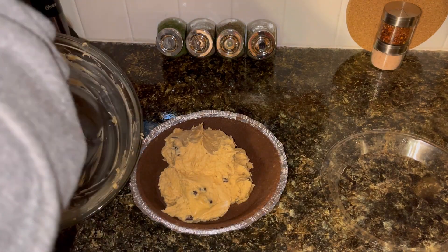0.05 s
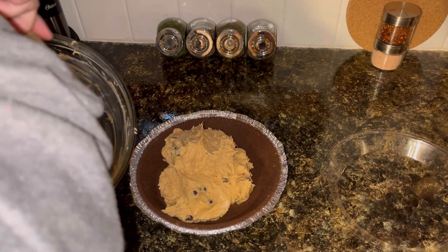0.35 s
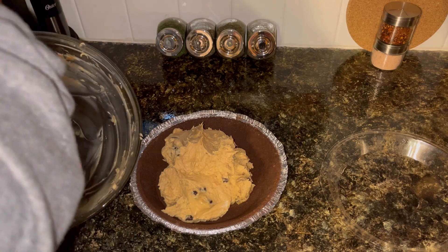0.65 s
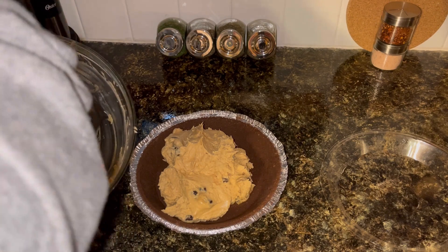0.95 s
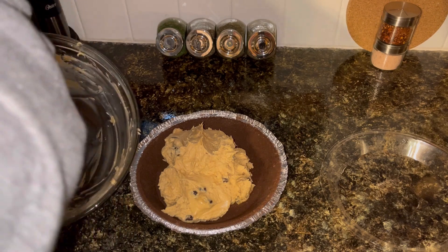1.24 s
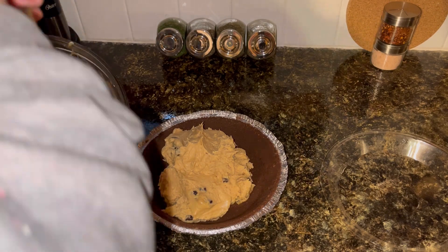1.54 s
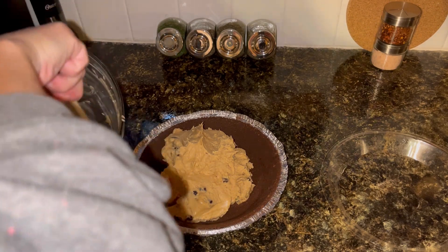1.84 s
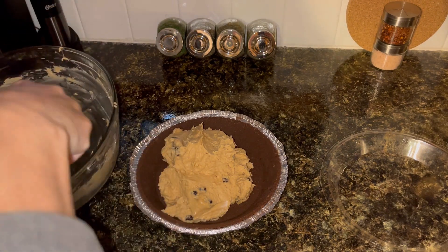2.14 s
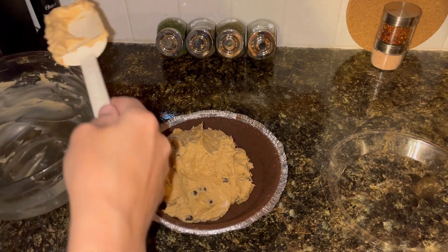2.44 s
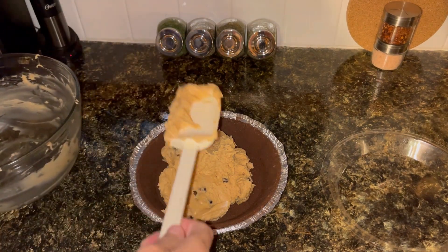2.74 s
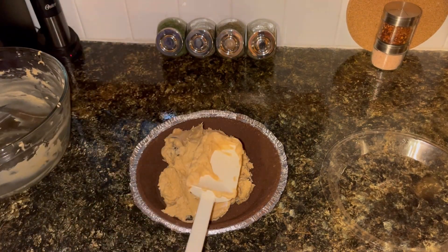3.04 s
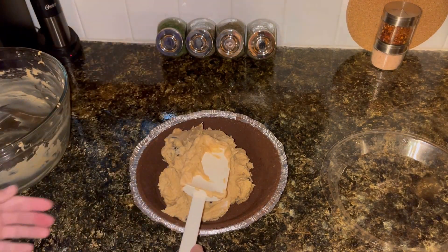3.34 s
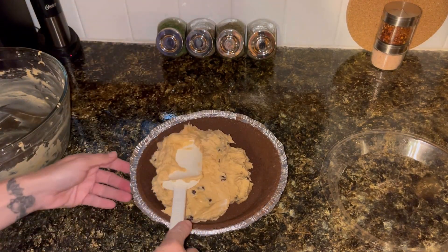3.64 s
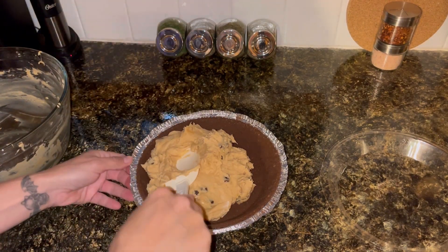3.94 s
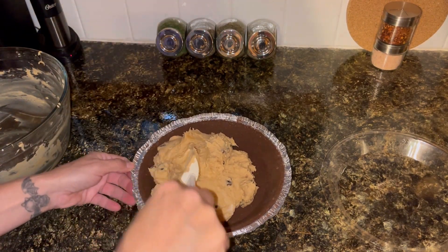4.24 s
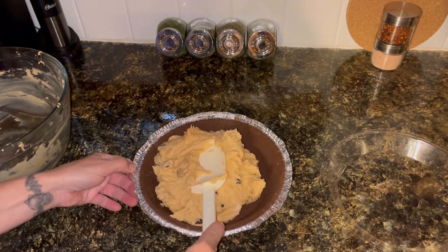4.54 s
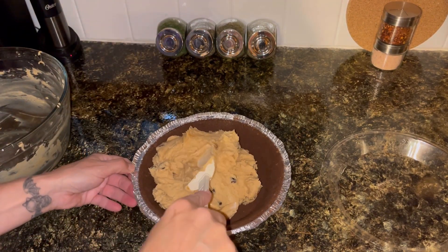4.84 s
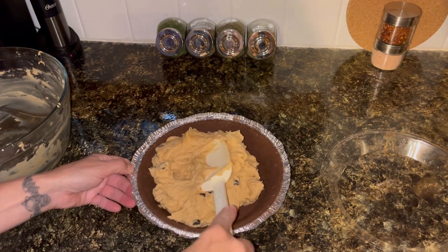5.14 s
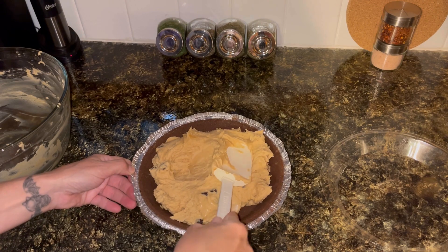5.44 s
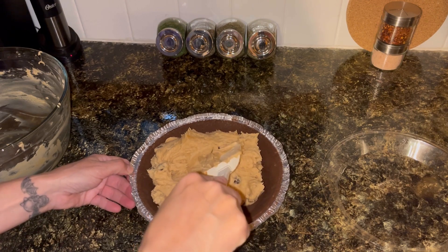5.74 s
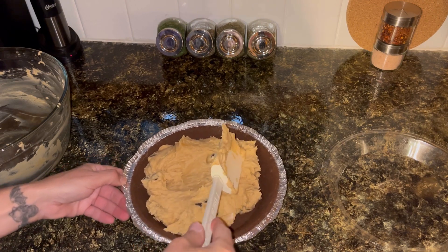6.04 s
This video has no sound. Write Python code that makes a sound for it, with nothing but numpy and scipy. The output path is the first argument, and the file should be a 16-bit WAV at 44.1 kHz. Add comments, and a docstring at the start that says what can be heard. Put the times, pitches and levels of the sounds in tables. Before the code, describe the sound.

Faint sticky scraping, a glass bowl shoved over stone with a thud, then filling smacking wetly as it is spread in a ticking foil pan.

```python
"""In a small quiet kitchen, a silicone spatula wipes creamy filling from a glass bowl: the cream
crackles and pops, the blade rubs and taps the glass once (1.0 s). From 2.3 s the bowl slides in short,
gritty, ringing shoves on a stone counter, and is set down with a thud (2.6 s). From 3.4 s the spatula
spreads the filling with wet smacks in a foil pan, which ticks as it flexes."""
import sys
import numpy as np
from scipy import signal
from scipy.fft import rfft, irfft
from scipy.io import wavfile

SR = 44100
rng = np.random.default_rng(int(sys.argv[2]) if len(sys.argv) > 2 else 0)


def wav_record(signal):
    """Record a signal, one row per channel, as 16-bit PCM in the file named by sys.argv[1]."""
    frames = np.transpose(np.atleast_2d(signal))
    bounded = np.clip(frames, -1, 1)
    # unit amplitude maps onto the largest positive 16-bit level
    quanta = np.round(bounded * 32767).astype(np.int16)
    wavfile.write(sys.argv[1], SR, quanta)


N = 268128


def gain_of(db):
    """Decibels to amplitude."""
    return 10 ** (np.asarray(db) / 20)


def unit_rms(x):
    """Scales to rms 1."""
    return x / np.sqrt(np.mean(x ** 2) + 1e-20)


def unit_peak(x):
    """Scales to peak 1."""
    return x / np.abs(x).max()


def at_hz(points, hz):
    """Interpolates a table over log frequency."""
    table_hz, value = np.transpose(points)
    return np.interp(np.log(hz + 1), np.log(table_hz + 1), value)


def add(mix, time_s, sound):
    """Mixes a sound in at time_s."""
    part = mix[round(time_s * SR):][:len(sound)]
    part += sound[:len(part)]


def colour(x, spectrum, size=8192):
    """Minimum-phase EQ, keeps clicks sharp. Spectrum: (frequency [Hz], gain [dB])."""
    hz = np.abs(np.fft.fftfreq(size, 1 / SR))
    log_gain = np.log(gain_of(at_hz(spectrum, hz)))
    response = np.fft.ifft(np.exp(np.conj(signal.hilbert(log_gain)))).real[:size // 2]
    return signal.oaconvolve(x, response)[:len(x)]


def noise(spectrum):
    """Steady coloured noise, no DC, rms 1."""
    hz = np.fft.rfftfreq(N, 1 / SR)
    shaped = rfft(rng.standard_normal(N)) * gain_of(at_hz(spectrum, hz))
    return unit_rms(irfft(shaped * hz / (hz + 6), N))


def resonate(x, hz, width_hz):
    """One-pole resonance centred on hz."""
    carrier = np.exp(2j * np.pi * hz * np.arange(len(x)) / SR)
    pole = np.exp(-np.pi * width_hz / SR)
    return (carrier * signal.lfilter([1 - pole], [1, -pole], x / carrier)).real


def ring(modes):
    """Struck body: decaying sines of alternating sign."""
    t = np.arange(SR) / SR
    return sum((-1) ** k * gain_of(db - 60 * t / t60_s) * np.sin(2 * np.pi * hz * t)
               for k, (hz, db, t60_s) in enumerate(modes))


def grains(per_s, spread_db, clump_db, clump_hz, hiss):
    """Tiny uneven slips in clumps, over a hiss of smaller ones."""
    size = gain_of(spread_db * np.minimum(rng.exponential(1, N), 3.5))
    clicks = size * rng.choice([-1, 1], N) * (rng.random(N) < per_s / SR)
    clumps = np.interp(np.arange(N) * clump_hz / SR, np.arange(N), rng.standard_normal(N))
    return (unit_rms(clicks) + hiss * rng.standard_normal(N)) * gain_of(clump_db * clumps)


def burst(t60_s, hz, q, snap):
    """A snap and its decaying spray through one resonance, Q at least 0.6."""
    t = np.arange(SR // 4) / SR
    spray = rng.standard_normal(len(t)) * gain_of(-60 * t / t60_s)
    spray[0] = snap
    b, a = signal.iirpeak(hz, max(q, .6), fs=SR)
    return unit_peak(signal.lfilter(b, a, spray))


def stroke(start_s, length_s, crest, swell_db, attack_s=0.034, release_s=0.039):
    """Gain of one hand movement, peaking at the fraction crest of its length."""
    t = np.arange(N) / SR - start_s
    contact = np.interp(t, [-attack_s, 0, length_s, length_s + release_s], [0, 1, 1, 0])
    force_db = np.interp(t, [0, crest * length_s, length_s], [-swell_db, 0, -swell_db])
    return contact * gain_of(force_db)


# room rumble: (time [s], level [dB])
RUMBLE_LEVELS = [(0, -47), (.9, -42.5), (1.15, -41), (3.2, -39), (4.7, -43), (6.08, -39)]
# room rumble and hiss spectra: (frequency [Hz], gain [dB])
RUMBLE_EQ = [(20, 10.5), (35, -9.5), (60, -7.5), (90, -20), (130, -25.5), (250, -52), (1000, -100)]
HISS_EQ = [(60, 3), (120, -3), (200, -5.5), (400, -10), (800, -17), (1300, -20.5), (2000, -24),
           (4000, -25.5), (8000, -30.5), (12000, -33), (16000, -33)]


def room_tone(hiss_db=-63.5, whine_hz=1136, whine_db=-86):
    """Swelling low rumble, faint hiss and a thin appliance whine."""
    whine = unit_rms(resonate(rng.standard_normal(N), whine_hz, width_hz=1.4))
    rumble_db = np.interp(np.arange(N) / SR, *np.transpose(RUMBLE_LEVELS))
    rumble = gain_of(rumble_db) * noise(RUMBLE_EQ)
    return rumble + gain_of(hiss_db) * noise(HISS_EQ) + gain_of(whine_db) * whine


# strokes round the bowl: (start [s], length [s], crest [0-1], crackle [dB], rub [dB])
WIPE_STROKES = [(0.0, 0.2, 1, -75.5, -69.5), (0.312, 0.28, 1, -84.5, -66.5), (0.59, 0.23, 0.26, -75, -75),
                (1.142, .16, 1, -72.5, -76), (1.343, 0.296, 0.65, -96, -57), (1.738, 0.305, 1, -78, -56.5),
                (2.126, 0.5, 0.39, -80, -54)]
# cream crackle and blade rub spectra: (frequency [Hz], gain [dB])
CRACKLE_EQ = [(500, -24), (1500, -13), (3000, -7), (5000, -2), (7000, 0), (10000, -5), (13000, -22)]
RUB_EQ = [(80, 1), (150, 19.5), (280, -8), (420, -2), (600, -4), (1000, -10.5), (2000, -16), (4000, -42.5)]


def wiping():
    """Cream crackles off the glass while the blade rubs."""
    wet = sum(gain_of(db) * stroke(*timing, swell_db=2.5) for *timing, db, _ in WIPE_STROKES)
    press = sum(gain_of(db) * stroke(*timing, swell_db=5) for *timing, _, db in WIPE_STROKES)
    pops = grains(per_s=350, spread_db=4, clump_db=2, clump_hz=70, hiss=.5)
    slips = grains(per_s=220, spread_db=6, clump_db=5, clump_hz=40.5, hiss=0.44)
    return wet * unit_rms(colour(pops, CRACKLE_EQ)) + press * unit_rms(colour(slips, RUB_EQ))


# air pockets: (time [s], level [dB], pitch [Hz], t60 [s])
POCKET_POPS = [(.149, -50, 6700, 0.044), (.1774, -46, 5070, .05), (0.212, -53.5, 3020, 0.052),
               (.797, -41.5, 5100, 0.038), (3.449, -47.5, 1580, 0.13), (3.725, -40.5, 5000, 0.032),
               (3.8163, -39, 3500, .088), (3.824, -37, 3550, 0.071), (4.531, -41, 5500, 0.014),
               (4.562, -40, 5800, .02), (4.574, -39, 5000, 0.018), (4.59, -45, 5400, .03),
               (4.604, -35.5, 5400, 0.027), (5.538, -45, 1800, 0.079), (5.803, -41.5, 5170, 0.014),
               (5.9, -47.5, 1270, 0.078)]


def smacks():
    """Larger air pockets pop, their treble softened by the cream."""
    out = np.zeros(N)
    for time_s, db, hz, t60_s in POCKET_POPS:
        add(out, time_s, gain_of(db) * burst(t60_s, hz, q=1.2, snap=5.3))
    return colour(out, [(300, 19.5), (800, 11), (1500, 1.5), (6500, 1.5), (10000, -11), (13000, -9)])


# bowl modes; each close pair has a fast and a slow decay: (frequency [Hz], level [dB], t60 [s])
BOWL_MODES = [(393, -6, .33), (958, -7, .13), (1699, 0, .1), (2283, -8, .07), (1696, -10, .42),
              (2640, -1.5, .075), (3047, -10, .09), (2638, -12.5, .42), (3736, -3, .1), (5066, -11, .11),
              (5835, -13, .14), (6315, -15, .12), (7111, -16, .14)]
# spatula on glass: (time [s], level [dB])
BOWL_TAPS = [(1.02, -30)]
# sharp contact ticks, most as the bowl bumps the counter: (time [s], level [dB], pitch [Hz], t60 [s])
CONTACT_TICKS = [(1.28, -52.5, 1670, .06), (1.465, -54.5, 1690, 0.04), (1.5368, -39, 3520, 0.2),
                 (1.989, -53.5, 1500, 0.09)]


def tap_and_ticks():
    """A tap rings the bowl; the bowl's bumps on the counter only give brief contact ticks."""
    out = np.zeros(N)
    for time_s, db in BOWL_TAPS:
        clink = unit_peak(ring(BOWL_MODES))
        add(clink, 0, 1.6 * burst(t60_s=0.032, hz=2330, q=0.9, snap=1.5))
        add(out, time_s, gain_of(db) * unit_peak(clink))
    for time_s, db, hz, t60_s in CONTACT_TICKS:
        add(out, time_s, gain_of(db) * burst(t60_s, hz, q=0.54, snap=4.4))
    return colour(out, [(6500, 0), (9000, -5.5), (13000, -17)])


# stone counter modes: (frequency [Hz], level [dB], t60 [s])
COUNTER_MODES = [(76.4, -22, 0.87), (157.3, 6.5, 0.035), (171, -1, 0.051), (209.4, -3.5, 0.12),
                 (293.5, -6.5, 0.12), (367.5, -3, 0.068), (447, -4, 0.036), (544.6, -3, 0.1),
                 (603, -9, 0.12), (722, -5, 0.093), (820, -6.5, 0.044), (1106, -6.5, 0.034)]
# blows thudding through the counter (at 3.44 s a hand knocks the pan): (time [s], peak [dB], cutoff [Hz])
COUNTER_BLOWS = [(1.02, -30, 70), (1.282, -40.5, 347), (1.348, -51, 350), (1.46, -45.5, 380),
                 (1.981, -43.5, 410), (2.113, -48, 390), (2.196, -51.5, 380), (2.435, -43, 403),
                 (2.604, -19.5, 259), (2.616, -10, 810), (2.6331, -10, 277), (2.825, -33.5, 400),
                 (2.935, -35.5, 287), (3.045, -44, 900), (3.439, -45, 450), (3.627, -51, 700),
                 (5.905, -41.5, 450)]


def thumps():
    """The counter thuds; softer contact rings fewer upper modes."""
    out, body = np.zeros(N), unit_peak(ring(COUNTER_MODES))
    for time_s, db, cutoff_hz in COUNTER_BLOWS:
        thud = signal.lfilter(*signal.butter(2, cutoff_hz, fs=SR), body)
        add(out, time_s, gain_of(db) * unit_peak(thud))
    return out


def singing(level_db=-60.5):
    """The rubber edge briefly bows the bowl's modes."""
    bowing = colour(rng.standard_normal(N), [(400, 6), (1700, -15), (4000, -24)])
    tone = unit_rms(signal.oaconvolve(bowing, ring(BOWL_MODES))[:N])
    return gain_of(level_db) * stroke(start_s=1.654, length_s=0.24, crest=0.65, swell_db=8) * tone


# bowl over stone: (start [s], length [s], crest [0-1], grit [dB], judder [dB])
SHOVE_STROKES = [(2.273, 0.031, .8, -63, -74.5), (2.424, 0.26, 0.13, -67, -61.5),
                 (2.597, 0.17, 0.1, -49, -39), (2.811, 0.18, 0.076, -51, -39.5),
                 (3.006, 0.057, 0.74, -43, -47.5)]
# bowl catching on grit: (time [s], level [dB], pitch [Hz], t60 [s], Q)
GRIT_CATCHES = [(2.295, -46, 2180, 0.088, 0.46), (2.432, -49, 1830, 0.069, 0.9),
                (2.68, -33, 6000, 0.055, 0.5), (2.771, -42, 1460, 0.028, 1.6),
                (2.826, -33.5, 4350, 0.068, 0.39), (2.9898, -32, 3030, 0.039, 12),
                (2.995, -33.5, 1750, 0.099, 9.8), (3.018, -28.5, 5000, 0.047, 0.39),
                (3.046, -23, 4560, 0.038, 0.35)]
# high modes of the sliding bowl: (frequency [Hz], level [dB], t60 [s])
SLIDE_MODES = [(1736, -5, .18), (1832, -4, .2), (2428, -7, .13), (2805, -1, .2), (4237, -4, .13),
               (4829, -5, .13), (5843, 1, .17), (6624, 2, .18), (7074, 1, .18), (8732, -4, .11)]
# grit and counter judder spectra: (frequency [Hz], gain [dB])
GRIT_EQ = [(400, 4.5), (600, 5.5), (850, 7.5), (1300, 3.5), (1850, 1.5), (3000, -2), (3900, -8),
           (5000, -7.5), (7000, -13), (8000, -21.5), (10000, -24.5), (12000, -58), (15500, -52)]
JUDDER_EQ = [(50, -8), (85, -1), (135, 4), (185, -8.5), (240, -26), (320, 0), (420, -16.5), (800, -36.5),
             (1500, -59)]


def sliding():
    """Glass grinds over stone: slips shake the counter and ring the bowl's high modes."""
    grind = sum(gain_of(db) * stroke(*timing, swell_db=7.5) for *timing, db, _ in SHOVE_STROKES)
    shake = sum(gain_of(db) * stroke(*timing, swell_db=5) for *timing, _, db in SHOVE_STROKES)
    slips = grind * unit_rms(grains(per_s=3000, spread_db=3, clump_db=3.5, clump_hz=119.4, hiss=0.83))
    grit = gain_of(5) * slips.std() * unit_rms(colour(slips, GRIT_EQ))
    catches = np.zeros(N)
    for time_s, db, hz, t60_s, q in GRIT_CATCHES:
        add(catches, time_s, gain_of(db) * burst(t60_s, hz, q, snap=5.6))
    catches = colour(catches, [(7000, 1), (9000, -10.5), (12000, -21.5)])
    bowl = ring(SLIDE_MODES)
    ringing = signal.oaconvolve(slips + gain_of(-20) * catches, bowl / np.linalg.norm(bowl))[:N]
    jolts = grains(per_s=150, spread_db=5.5, clump_db=2, clump_hz=38.47, hiss=0.17)
    judder = shake * unit_rms(colour(jolts, JUDDER_EQ))
    return grit + catches + gain_of(-12) * ringing + judder


# sharpest foil ticks: (time [s], level [dB])
FOIL_TICKS = [(3.3528, -48), (3.5613, -40.5), (3.776, -41.5), (4.117, -42), (4.24, -41), (4.28, -48),
              (5.1278, -45), (5.245, -35)]


def foil(ticks_per_s=25):
    """The thin pan flexes: a few sharp ticks, and faint random ones during the strokes."""
    flexing = sum(stroke(*row[:3], swell_db=0) for row in SPREAD_STROKES)
    impulses = rng.uniform(-1, 1, N) * (rng.random(N) < ticks_per_s / SR)
    tick = burst(t60_s=0.021, hz=7000, q=1, snap=7.8)
    out = gain_of(-42.5) * signal.oaconvolve(flexing * impulses, tick)[:N]
    for time_s, db in FOIL_TICKS:
        add(out, time_s, gain_of(db) * burst(t60_s=0.03, hz=6340, q=1, snap=8))
    return colour(out, [(8000, 0), (12000, -7)])


# pan strokes: (start [s], length [s], crest [0-1], crackle [dB], smear [dB], push [dB], hollow [Hz])
SPREAD_STROKES = [(3.456, 0.31, 0.14, -65, -68.5, -54, 1520), (3.812, 0.17, 0.17, -69, -75, -65.5, 1600),
                  (4.014, .13, 0.32, -62, -59, -59, 1750), (4.246, 0.084, .3, -72, -72, -67, 705),
                  (4.403, 0.27, 0.84, -66.5, -56.5, -56, 810), (4.763, 0.19, 0.31, -68, -68.5, -69, 1590),
                  (5.014, 0.29, 0.82, -67.5, -71, -68, 3500), (5.331, 0.1, 0.61, -71.5, -76.5, -64.5, 1700),
                  (5.501, 0.17, 0.12, -67.5, -71, -68, 1270), (5.742, .14, 1, -62.5, -59.5, -62, 3650),
                  (5.889, 0.29, 0.038, -58.5, -58, -50.5, 1310)]
# tearing cream, smear and pushed pan spectra: (frequency [Hz], gain [dB])
CREAM_EQ = [(1200, -17), (2500, -2), (3700, 2), (4600, 1), (5800, 1.5), (8000, -6), (10000, -5.5),
            (12000, -20.5), (15500, -18)]
SMEAR_EQ = [(350, -7), (550, 0.5), (820, 1), (1000, -4), (1300, -3), (1850, -1.5), (2900, -8.5),
            (4500, -8.5), (8000, -11), (14000, -59)]
PAN_EQ = [(80, -0.5), (150, 6.5), (230, -4), (330, -5), (450, -5), (700, -15.5), (1500, -45), (4000, -40)]


def spreading():
    """Filling tears in tiny pops and smears over a hollow under the blade, which pushes on the pan."""
    pops = grains(per_s=600, spread_db=4.5, clump_db=2.1, clump_hz=80, hiss=.5)
    slips = grains(per_s=710, spread_db=6, clump_db=4, clump_hz=76, hiss=0.93)
    nudges = grains(per_s=140, spread_db=-3.5, clump_db=7, clump_hz=42.1, hiss=0.24)
    crackle = unit_rms(colour(pops, CREAM_EQ))
    smear = unit_rms(colour(slips, SMEAR_EQ))
    pan = unit_rms(colour(nudges, PAN_EQ))
    out = np.zeros(N)
    for *timing, crackle_db, smear_db, push_db, hollow_hz in SPREAD_STROKES:
        squelch = gain_of(-6) * unit_rms(resonate(smear, hollow_hz, width_hz=0.25 * hollow_hz))
        tearing, pressing = stroke(*timing, swell_db=3.5), stroke(*timing, swell_db=9)
        out += gain_of(crackle_db) * tearing * crackle
        out += pressing * (gain_of(smear_db) * (smear + squelch) + gain_of(push_db) * pan)
    return out


# kitchen reverberation: (frequency [Hz], t60 [s])
KITCHEN_DECAY = [(100, 0.43), (400, 0.57), (1500, 0.32), (5000, 0.29), (9000, 0.22), (15000, 0.41)]


def kitchen(x, echoes_per_s=3000, predelay_s=.003, size=256):
    """Dense reflections off tiles and cupboards, each band decaying at its own rate."""
    echoes = rng.standard_normal(SR) * (rng.random(SR) < echoes_per_s / SR)
    echoes *= np.arange(SR) > predelay_s * SR
    hz, t, bands = signal.stft(echoes, SR, nperseg=size)
    decay = gain_of(-60 * t / at_hz(KITCHEN_DECAY, hz)[:, None])
    tail = signal.istft(bands * decay, SR, nperseg=size)[1]
    return signal.fftconvolve(x, tail / np.linalg.norm(tail))[:N]


def scene():
    """Mono mix of handling, reflections and room tone."""
    handling = wiping() + singing() + tap_and_ticks() + sliding() + spreading() + smacks() + foil()
    thuds = thumps()
    reflections = kitchen(gain_of(-8) * handling + gain_of(-12) * thuds)
    return (handling + thuds + reflections + room_tone())[None]


def record(dry):
    """Low-pass at 15.9 kHz."""
    lowpass = signal.firwin(511, 15900, window=("kaiser", 9), fs=SR)
    return signal.oaconvolve(dry, lowpass[None], "same")


dry = scene()
out = record(dry)
wav_record(out)
```